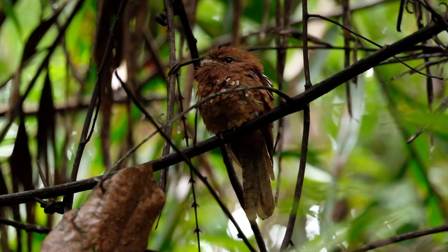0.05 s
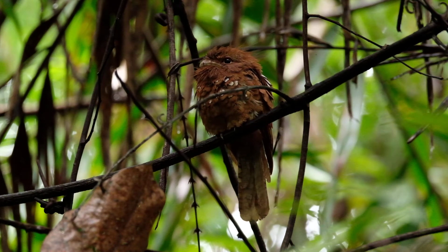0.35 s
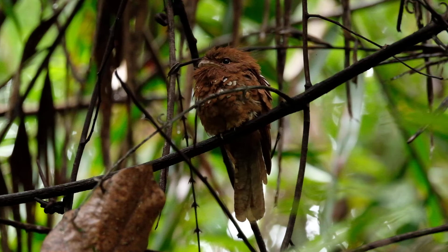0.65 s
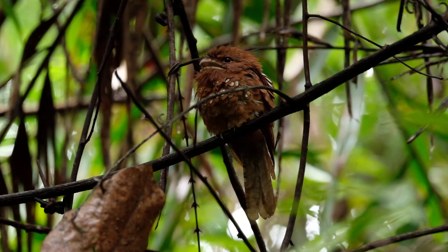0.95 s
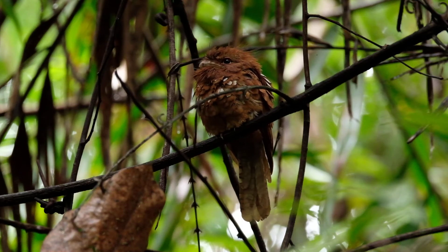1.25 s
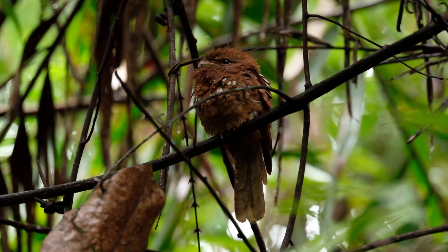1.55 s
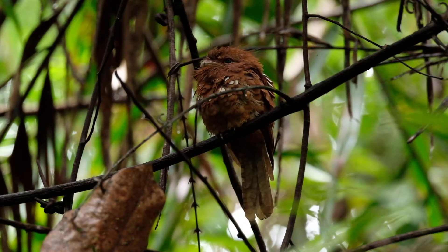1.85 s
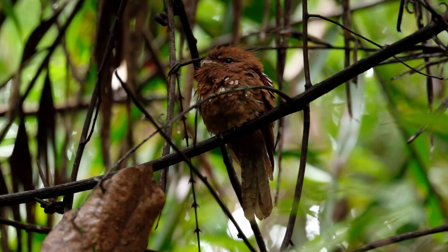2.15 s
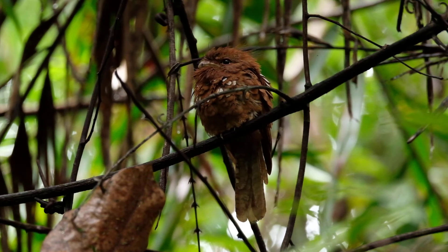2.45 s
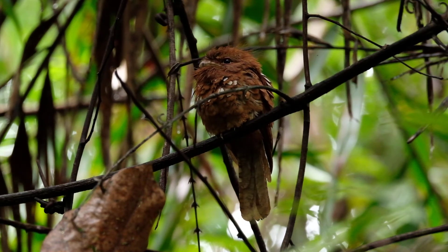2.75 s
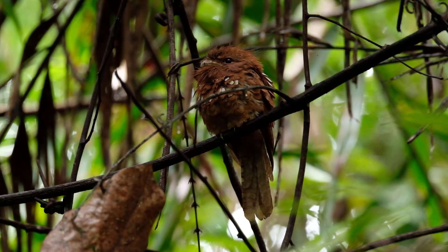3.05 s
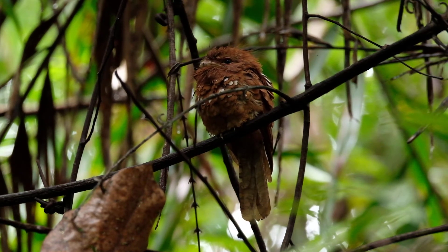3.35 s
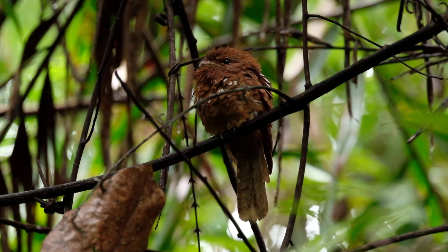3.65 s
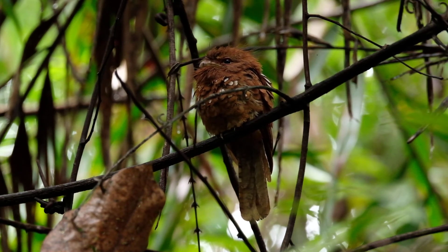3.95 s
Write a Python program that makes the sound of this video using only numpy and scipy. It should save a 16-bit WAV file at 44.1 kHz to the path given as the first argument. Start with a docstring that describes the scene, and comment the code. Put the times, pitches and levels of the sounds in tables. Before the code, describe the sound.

A dense, high cicada chorus buzzes throughout in a rainforest, with a thin wavering whine and faint crickets. Early on, a close bird pips twice, while farther birds repeat a swooping note and whistle thinly over a low hush.

```python
"""A rainforest, with a dense band of cicadas clicking their tymbals over a low forest hush.
One cicada whines and flutters on its own; its side buzz and far crickets throb in narrow bands.
Crickets rattle and chirp nearby. In the first half birds whistle among the trees: a repeated swooping
note, a close double pip, a thin, slowly falling whistle, a faint twitter and one high chip.
A drop taps a leaf. Leaves scatter the calls and trunks give them a tail."""
import sys
import numpy as np
from scipy import signal
from scipy.fft import rfft, irfft
from scipy.io import wavfile

SR = 44100
rng = np.random.default_rng(int(sys.argv[2]) if len(sys.argv) > 2 else 0)


def wav_record(signal):
    """Record a signal, one row per channel, as 16-bit PCM in the file named by sys.argv[1]."""
    frames = np.transpose(np.atleast_2d(signal))
    bounded = np.clip(frames, -1, 1)
    # unit amplitude maps onto the largest positive 16-bit level
    quanta = np.round(bounded * 32767).astype(np.int16)
    wavfile.write(sys.argv[1], SR, quanta)


N = 176400
T = np.arange(N) / SR

# cicada chorus colour: frequency_hz, relative_db
CICADA_SPECTRUM = [(2350, -57), (4000, -34), (4250, -29), (4850, -22), (5420, -3), (5820, 5), (6110, -4.5),
                   (6530, -16.5), (7160, -30), (7340, -28.5), (7860, -31.5), (7980, -39), (8200, -56.5),
                   (10700, -73), (18000, -120)]
# solo cicada's two notes: time_s, pitch_hz, level_db, overtones_db, flutter_depth
HIGH_WHINE_CURVE = [(0, 3128, -56.5, -57, 0.3), (.2, 3133, -59, -58, 0.05), (.5, 3140, -52.5, -62.5, 0.48),
                    (1.05, 3150, -53, -59.5, 0.36), (1.25, 3149, -53.5, -56, 0.06),
                    (1.42, 3156, -48.5, -62, 0.02), (1.62, 3158, -56, -60, 0.06),
                    (1.9, 3163, -53.5, -53.5, 0.36), (2.08, 3161, -64, -81, .45),
                    (2.36, 3155, -70, -85, 0.3), (2.85, 3116, -60, -72, 0.5),
                    (3.05, 3121, -60.5, -64.5, 0.3), (3.26, 3125, -57.5, -58, 0.3),
                    (3.7, 3137, -56.5, -60.5, .45), (4, 3142, -53, -60, 0.2)]
LOW_WHINE_CURVE = [(2.36, 2850, -76, -77, .2), (2.42, 2855, -53.5, -57, 0.15),
                   (2.6, 2855, -49.5, -58, 0.14), (2.68, 2855, -60.5, -58, 0.34),
                   (2.82, 2857, -55, -58.5, .3), (2.98, 2850, -66, -80, .3)]
# their overtones: harmonic_number, relative_db
HIGH_WHINE_OVERTONES = [(3, -10.5), (4, 1.5)]
LOW_WHINE_OVERTONES = [(3, -9.5), (4, 4.5), (5, -19)]
# swooping bird's calls: start_s, level_db
SWOOP_CALLS = [(-.092, -38), (.378, -38.5), (0.865, -37.5), (1.402, -39)]
# shape of one swoop: time_s, pitch_hz, relative_db
SWOOP_CURVE = [(0, 2010, -5.5), (.009, 1668, 5), (.018, 1396, 3), (.034, 1050, -6), (.06, 859, -11.5),
               (.086, 1102, -10.5), (.099, 1485, 3), (.109, 1783, 2), (.122, 1808, 5.5), (.13, 1730, -10)]
# close bird: start_s, length_s, level_db, pitch_hz, onset_offset_hz
PIP_NOTES = [(0.405, 0.024, -23.5, 1831, -450), (.5015, 0.023, -24, 1835, 497)]
# far whistler and faint twitter: start_s, length_s, level_db, first_hz, last_hz
WHISTLE_NOTES = [(-.03, .21, -58, 2580, 2780), (.3, 0.35, -54.5, 2565, 2634), (.64, 0.16, -56, 2510, 2518),
                 (.808, 0.34, -49.5, 2542, 2540), (1.17, 0.32, -52.5, 2502, 2484),
                 (1.52, 0.12, -57, 2488, 2493), (1.65, .14, -55.5, 2470, 2415),
                 (1.81, 0.14, -51.5, 2437, 2475), (1.96, 0.21, -51.5, 2462, 2450)]
TWITTER_NOTES = [(.6, .16, -57.5, 3620, 3708), (.77, .08, -59.5, 3950, 4050),
                 (.86, 0.11, -63.5, 4120, 3983), (1.02, 0.081, -55, 3020, 2833)]
# high chip: time_s, pitch_hz, level_db
CHIP_CURVE = [(.458, 3380, -66), (.468, 3790, -42), (.48, 3870, -43.5), (.495, 3800, -63.5)]
# rattling cricket: start_s, length_s, level_db
RATTLE_BURSTS = [(0.241, .3, -53), (0.867, .32, -52.5), (1.577, 0.32, -52), (2.219, .34, -53),
                 (3.75, .32, -52)]
# high cricket: first_pulse_s, pulse_count, level_db
CHIRP_GROUPS = [(.637, 7, -57), (1.065, 1, -57), (1.235, 2, -57), (1.383, 3, -57.5), (1.581, 3, -60),
                (1.776, 3, -58.5), (1.97, 3, -58.5), (2.17, 3, -59.5), (2.403, 2, -58), (2.606, 2, -59),
                (2.81, 2, -58), (3.05, 1, -57), (3.25, 1, -58)]
# narrow throbbing insect bands: pitch_hz, width_hz, level_db
INSECT_BANDS = [(3043, 120, -63), (3187, 78, -64), (3293, 59, -67), (4990, 40, -71.5), (6600, 200, -62.5),
                (7570, 100, -74), (9090, 50, -77.5)]
# colour of the low hush and the high insect fizz: frequency_hz, relative_db
HUSH_SPECTRUM = [(15, -51), (25, -10), (172, 0.5), (406, 0), (433, 0), (623, -2.5), (1070, -8), (1290, -6),
                 (1440, -10), (2300, -15), (3040, -13), (3460, -16.5), (4200, -22.5), (5460, -60),
                 (9240, -120)]
FIZZ_SPECTRUM = [(7000, -39), (8000, -19), (9000, -10.5), (10000, -6), (11000, -1.5), (12000, -0.5),
                 (12900, 1), (13300, -43), (15000, -61)]
# stereo width of the noise beds: frequency_hz, left_right_correlation
BED_CORRELATION = [(60, -0.06), (500, 0.18), (1500, 0.24), (3000, 0.09), (5800, -0.16), (12000, 0)]
# their lean: frequency_hz, left_minus_right_db
BED_BALANCE = [(60, -4), (130, -2.5), (280, -3.5), (610, -1.0), (1340, -1.5), (2900, 2.5), (6300, 1.0),
               (13700, -0.5)]


def cicada_chorus(level_db=-39, buzz_db=0.62, buzz_hz=380, swell_db=0.1):
    """Many cicadas merge into one band, roughened by their tymbal clicks."""
    band = noise_bed(lambda hz: amp(curve_at(CICADA_SPECTRUM, hz)))
    roughness = amp(buzz_db * wander(buzz_hz) - swell_db * wander(3.3))
    return amp(level_db) * unit_rms(band * roughness)


def cicada_whine(curve, overtones, stroke_hz, bend_rad, flutter_hz, jitter, rasp_rad):
    """A ringing, fluttering tone; each tymbal stroke bends its phase, adding buzzy sidebands."""
    times, pitch_hz, level_db, overtones_db, depth = np.transpose(curve)
    strokes = np.cumsum(stroke_hz * (1 + 0.019 * wander(10))) / SR
    ripple = np.sin(2 * np.pi * strokes) + .6 * np.sin(4 * np.pi * strokes + 1)
    pitch = np.interp(T, times, pitch_hz) * (1 + jitter * wander(120))
    phase = 2 * np.pi * np.cumsum(pitch) / SR + bend_rad * ripple + rasp_rad * wander(400)
    flutter = np.interp(T, times, depth) * tone(flutter_hz * (1 + 0.269 * wander(14.3)))
    body_gain = amp(np.interp(T, times, level_db, left=-120, right=-120)) * (1 + flutter)
    sheen_gain = amp(np.interp(T, times, overtones_db, left=-120, right=-120)) * (1 + flutter / 2)
    sheen = sum(amp(db) * np.sin(harmonic * phase) for harmonic, db in overtones)
    return np.sqrt(2) * (body_gain * np.sin(phase) + sheen_gain * sheen)


def bird_swoops(rasp_db=2):
    """A bird's slightly raspy note dives over an octave and climbs back."""
    out = np.zeros(N)
    for start, db in SWOOP_CALLS:
        add(out, start, amp(db) * glide(SWOOP_CURVE))
    return out * amp(rasp_db * wander(220))


def bird_pips(attack_s=0.01, decay_s=0.014, flick_s=.002):
    """Two loud short notes flick onto a held pitch and die away quickly."""
    out, t = np.zeros(N), T[:SR // 5]
    for start, length, db, hz, offset_hz in PIP_NOTES:
        envelope = np.minimum(t / attack_s, 1) * np.exp(-np.maximum(t - length, 0) / decay_s)
        pitch = hz + offset_hz * np.exp(-t / flick_s) + 18 * wander(197)[:len(t)]
        add(out, start, amp(db) * envelope * tone(pitch))
    return out


def bird_whistles(notes, edge_s=.03, fade_db=-3):
    """Thin notes, each quivering along a straight slide of pitch."""
    out = np.zeros(N)
    for start, length, db, first_hz, last_hz in notes:
        progress = np.arange(0, 1, 1 / (length * SR))
        edges = np.minimum(np.minimum(progress, 1 - progress) * length / edge_s, 1)
        pitch = first_hz + (last_hz - first_hz) * progress + 7 * wander(79)[:len(progress)]
        add(out, start, amp(db + fade_db * progress) * edges * tone(pitch))
    return out


def bird_chip():
    """One high upward flick from a small bird."""
    out = np.zeros(N)
    add(out, CHIP_CURVE[0][0], glide(CHIP_CURVE))
    return out


def cricket_rattles(pitch_hz=5010, droop_hz=420, rate_hz=35, stroke_s=.024):
    """Bursts of quick strokes that each hold their pitch and droop at the end."""
    out, progress = np.zeros(N), np.arange(0, 1, 1 / (stroke_s * SR))
    pitch = pitch_hz - droop_hz * progress ** 4
    envelope = np.sin(np.pi * progress) ** .5
    for start, length, db in RATTLE_BURSTS:
        for onset in np.arange(start, start + length - stroke_s, 1 / rate_hz):
            add(out, onset + rng.normal(0, .002), amp(db) * envelope * tone(pitch + rng.normal(0, 11)))
    return out


def cricket_chirps(pitch_hz=7580, spacing_s=.039, pulse_s=0.029):
    """Short groups of pure high pulses."""
    out, envelope = np.zeros(N), np.hanning(int(pulse_s * SR))
    for start, count, db in CHIRP_GROUPS:
        for k in range(count):
            gain = amp(db + rng.normal(0, 1))
            pitch = np.full(len(envelope), pitch_hz + rng.normal(0, 11))
            add(out, start + k * spacing_s - pulse_s / 2, gain * envelope * tone(pitch))
    return out


def leaf_drop(at_s=.2127, level_db=-32, pitch_hz=1150, edge_s=0.00097):
    """A drop snaps on a leaf."""
    return amp(level_db) * np.exp(-abs(T - at_s) / edge_s) * np.sin(2 * np.pi * pitch_hz * (at_s - T))


def insect_bands(throb_db=2):
    """Narrow throbbing insect bands: the whining cicada's side buzz and far crickets."""
    out = np.zeros((2, N))
    for pitch, width, db in INSECT_BANDS:
        band = noise_bed(lambda hz: 1 / (1 + ((hz - pitch) / width) ** 2) ** 2)
        out += band * amp(db + throb_db * wander(23))
    return out


def forest_hush(hush_db=-47.5, fizz_db=-66):
    """The low hush of the forest, topped with a faint fizz of insects."""
    hush = noise_bed(lambda hz: amp(curve_at(HUSH_SPECTRUM, hz))) * amp(hush_db + 0.38 * wander(4))
    fizz = noise_bed(lambda hz: amp(curve_at(FIZZ_SPECTRUM, hz))) * amp(fizz_db)
    return hush + fizz


def among_trees(dry, tail_db, t60_s, left_db, early_db=-8, early_s=0.021):
    """Direct sound, quick scatter off nearby leaves and a long tail from the trunks."""
    t = T[:SR]
    taps = rng.standard_normal((2, 2, SR)) * (rng.random((2, 2, SR)) < .1)
    leaf_decay = np.exp(-t / early_s)
    trunk_decay = amp(-60 * t / t60_s) * (1 - np.exp(-t / 0.019))
    reflections = taps * np.array([leaf_decay, trunk_decay])[:, None]
    early, tail = reflections / np.linalg.norm(reflections, axis=2, keepdims=True)
    echoes = signal.fftconvolve(dry[None], amp(early_db) * early + amp(tail_db) * tail, axes=1)[:, :N]
    pan = amp([[left_db / 2], [-left_db / 2]])
    return (dry + echoes) * pan / np.sqrt(1 + amp(early_db) ** 2 + amp(tail_db) ** 2)


def off_to_one_side(stereo, drift_db=2, trim_db=-.5):
    """The sound reaches the right ear one sample later, and its level drifts in each ear."""
    delayed = np.array([stereo[0], np.roll(stereo[1], 1)])
    return delayed * amp(drift_db * np.array([wander(9), wander(9)]) + trim_db)


def noise_bed(colour):
    """Diffuse stereo noise of rms 1, shaped by the gain curve colour(hz)."""
    hz = np.fft.rfftfreq(N, 1 / SR)
    left, independent = rfft(rng.standard_normal((2, N)))
    correlation = curve_at(BED_CORRELATION, hz)
    right = correlation * left + np.sqrt(1 - correlation ** 2) * independent
    lean = amp(curve_at(BED_BALANCE, hz) / 2)
    return unit_rms(irfft(np.array([left * lean, right / lean]) * colour(hz), N))


def glide(points):
    """A whistled note through points of time_s, pitch_hz, level_db."""
    times, hz, db = np.transpose(points)
    t = np.arange(times[0], times[-1], 1 / SR)
    return tone(np.interp(t, times, hz)) * amp(np.interp(t, times, db))


def tone(hz):
    """A sine of rms 1 along a pitch curve."""
    return np.sqrt(2) * np.sin(2 * np.pi * np.cumsum(hz) / SR)


def wander(rate_hz):
    """Smooth random modulation of rms 1, mostly slower than rate_hz."""
    hz = np.fft.rfftfreq(N, 1 / SR)
    return unit_rms(irfft(rfft(rng.standard_normal(N)) / (1 + (hz / rate_hz) ** 2) ** 2, N))


def curve_at(points, hz):
    """Reads a curve on a log-frequency axis."""
    frequencies, values = np.transpose(points)
    return np.interp(np.log(hz + 1), np.log(frequencies + 1), values)


def add(mix, start_s, sound):
    """Mixes a sound in at start_s, trimming any overhang."""
    at = round(start_s * SR)
    sound = sound[max(-at, 0):]
    part = mix[max(at, 0):][:len(sound)]
    part += sound[:len(part)]


def amp(db):
    """Decibels to gain."""
    return 10 ** (np.asarray(db) / 20)


def unit_rms(x):
    """Scales to rms 1."""
    return x / np.sqrt(np.mean(x ** 2) + 1e-20)


def scene():
    """Insects all round, birds at various depths among the trees."""
    high = cicada_whine(HIGH_WHINE_CURVE, HIGH_WHINE_OVERTONES, stroke_hz=177, bend_rad=.085,
                        flutter_hz=23, jitter=.0004, rasp_rad=.025)
    low = cicada_whine(LOW_WHINE_CURVE, LOW_WHINE_OVERTONES, stroke_hz=120, bend_rad=.07,
                       flutter_hz=39, jitter=0.0028, rasp_rad=0.12)
    soloist = off_to_one_side(among_trees(high + low, tail_db=-5, t60_s=.4, left_db=1.5))
    insects = (cicada_chorus() + insect_bands() + soloist
               + among_trees(cricket_rattles(), tail_db=-0.5, t60_s=0.19, left_db=8)
               + among_trees(cricket_chirps(), tail_db=-12, t60_s=.3, left_db=0, early_db=-22))
    birds = (among_trees(bird_pips(), tail_db=-12, t60_s=.75, left_db=.8, early_db=-21)
             + among_trees(bird_swoops(), tail_db=4.5, t60_s=1, left_db=1.3, early_db=.5, early_s=.022)
             + among_trees(bird_whistles(WHISTLE_NOTES), tail_db=0.5, t60_s=0.83, left_db=1)
             + among_trees(bird_whistles(TWITTER_NOTES), tail_db=5, t60_s=.8, left_db=1.5)
             + among_trees(bird_chip(), tail_db=-1.5, t60_s=1.6, left_db=4))
    return insects + birds + forest_hush() + among_trees(leaf_drop(), tail_db=-10, t60_s=.25, left_db=-2)


def record(dry):
    """A steep low-pass takes off the top above 14.35 kHz."""
    lowpass = signal.firwin(511, 14350, window=("kaiser", 9), fs=SR)
    return signal.oaconvolve(dry, lowpass[None], "same")


dry = scene()
out = record(dry)
wav_record(out)
```